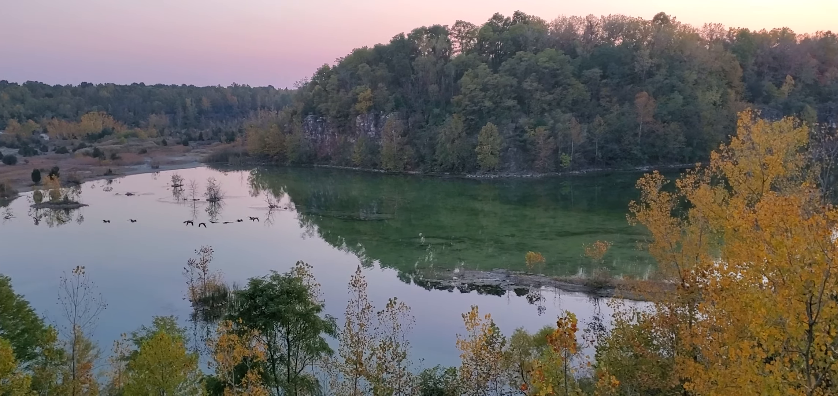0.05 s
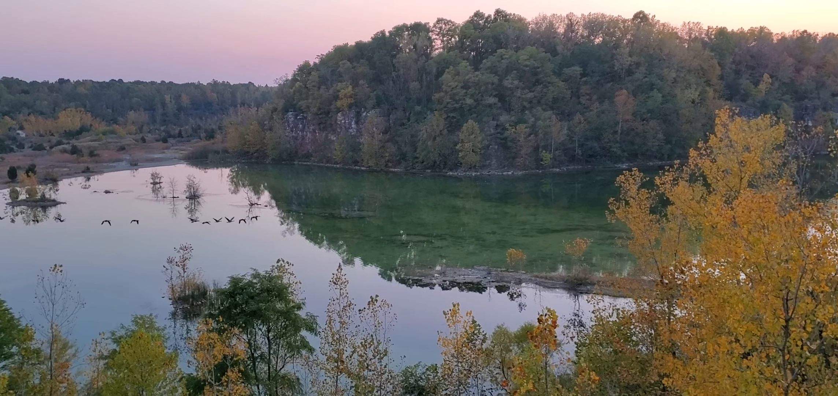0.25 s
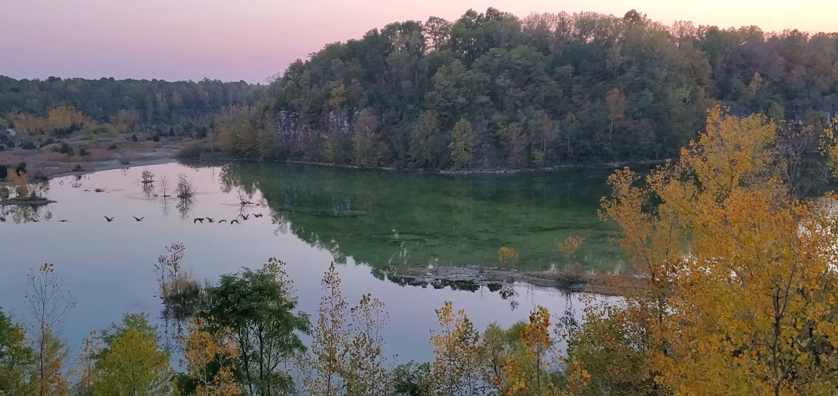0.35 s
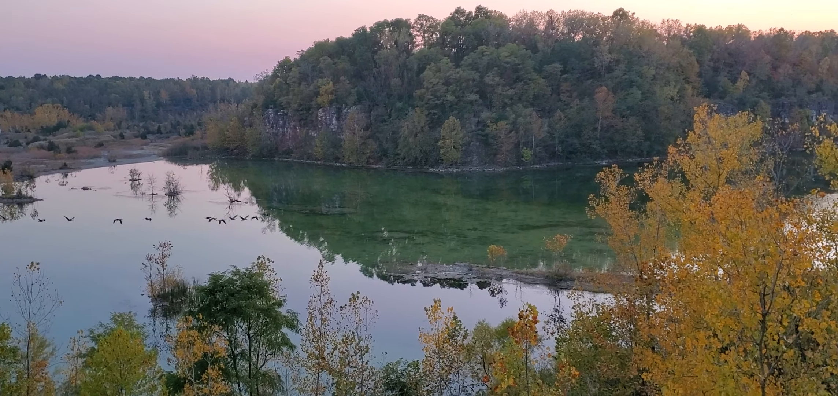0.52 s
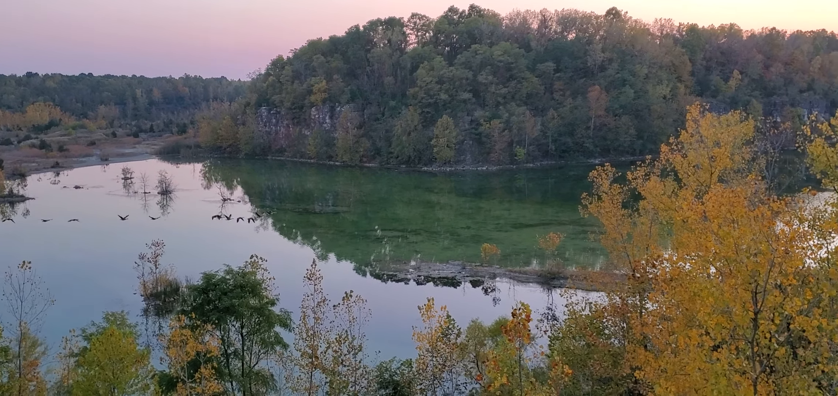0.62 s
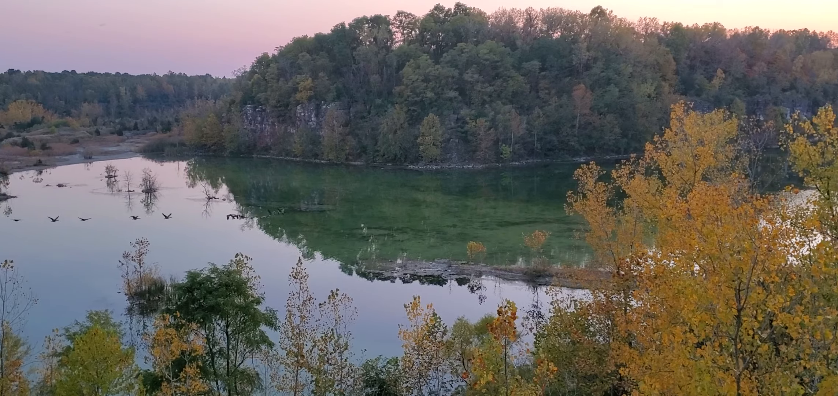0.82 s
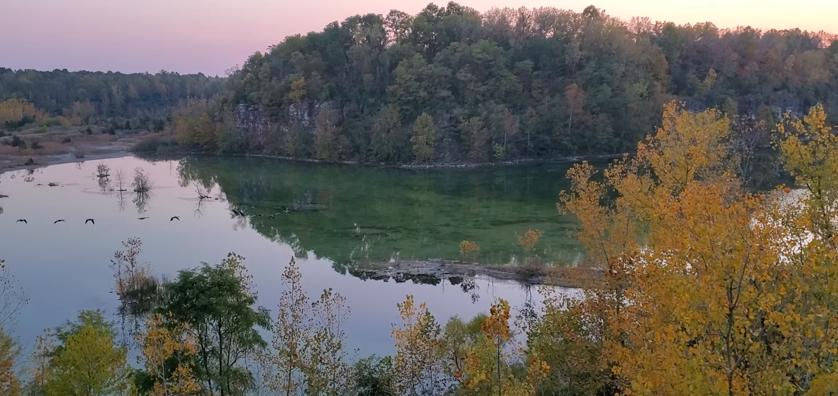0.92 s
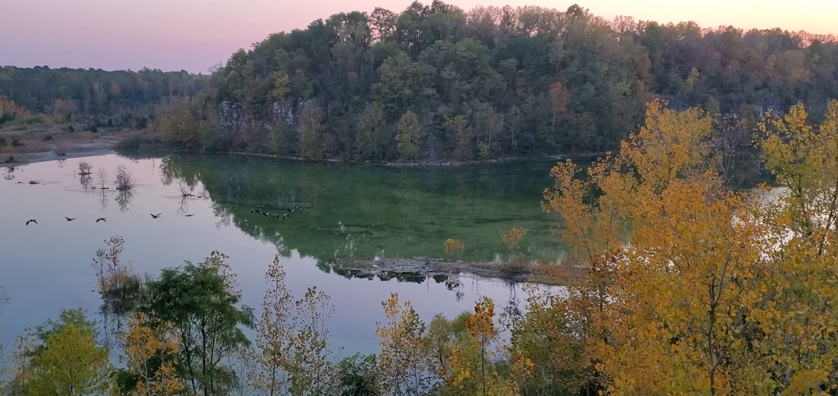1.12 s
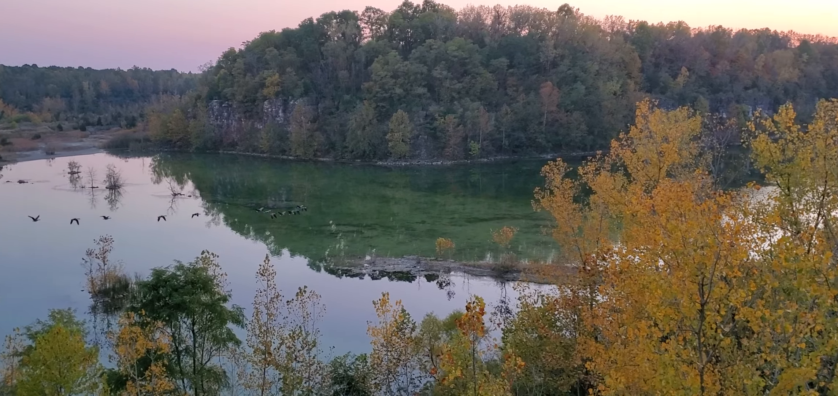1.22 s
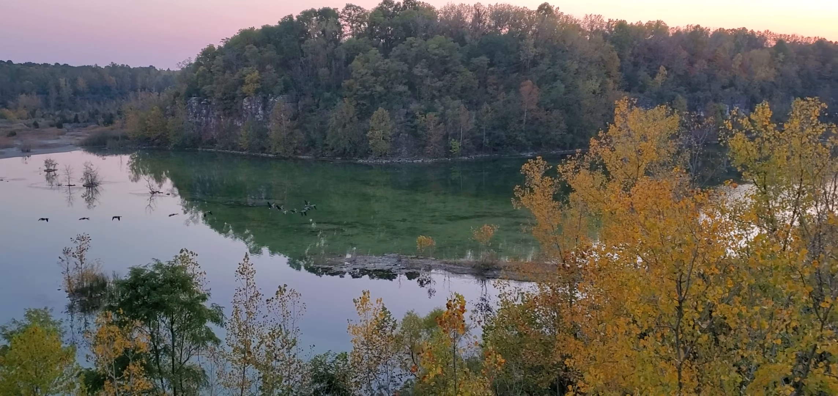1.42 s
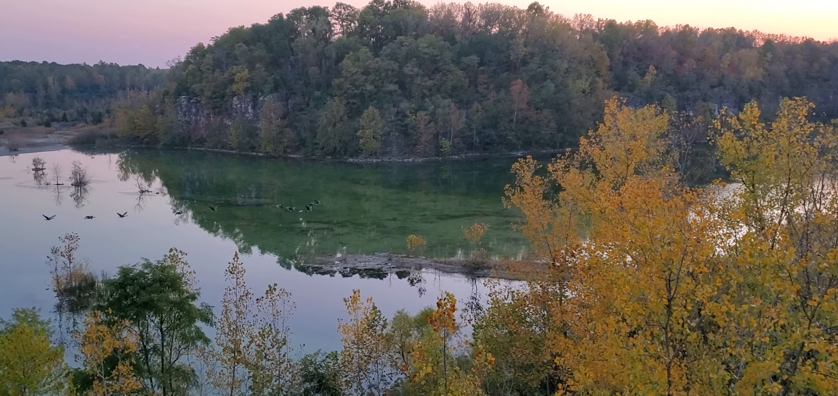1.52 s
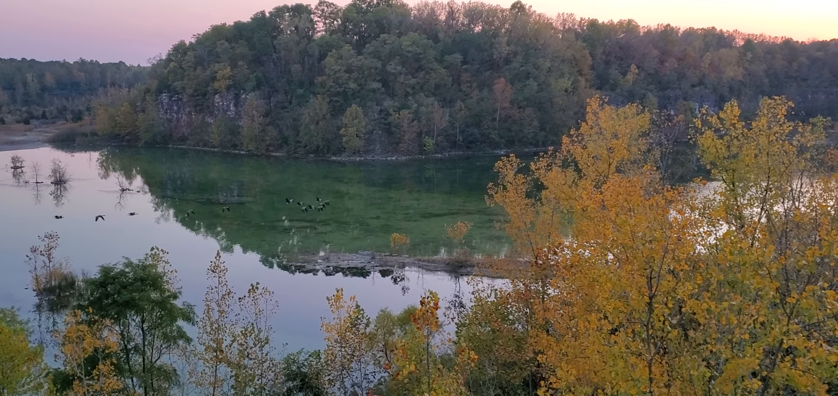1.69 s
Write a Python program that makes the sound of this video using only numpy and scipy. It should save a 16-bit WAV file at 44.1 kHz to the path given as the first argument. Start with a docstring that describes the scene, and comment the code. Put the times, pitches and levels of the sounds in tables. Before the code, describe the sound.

Two distant goose honks, rough then clear, echo over quiet water while handling knocks the microphone

```python
"""Geese honk twice, far off over a pond. Each honk starts low and rough and breaks up into a clear note;
the second drops back to a rasp. Each voice is a train of pulses plus air noise, rung through a throat.
Delayed and scattered copies of the calls make the echo of the wooded banks. Two handling thumps, which are
sinking tones with noise ticks, hit the left microphone port, and softer finger bumps follow the same path.
Shaped noise makes small rustles and the faint distant rumble and leaf hiss."""
import sys
import numpy as np
from scipy import signal
from scipy.fft import rfft, irfft, next_fast_len
from scipy.io import wavfile
from scipy.ndimage import map_coordinates

SR = 44100
rng = np.random.default_rng(int(sys.argv[2]) if len(sys.argv) > 2 else 0)


def pcm_store(signal):
    """Save signal as 16-bit PCM."""
    levels = np.round(np.clip(np.atleast_2d(signal), -1, 1) * 32767)
    wavfile.write(sys.argv[1], SR, levels.astype(np.int16).T)


N = 77175  # length in samples, 1.75 s

# Clear notes, one list each. Each row: time in seconds, pitch in Hz, level in dB, treble boost in dB.
CLEAR_NOTES = [
    [(.05, 516.3, -52.5, -9), (.09, 516.7, -41.5, -5.5), (.106, 533.4, -46, 0.5), (.122, 537, -38.5, -4.5),
     (.155, 541.7, -36, -7), (.172, 555, -43, 6), (.208, 557, -34.5, -1), (.235, 562, -40.5, -11),
     (.262, 547, -48, -1)],
    [(.57, 515, -67, -8), (.615, 528, -59, -8), (.655, 545, -56, -10), (.75, 545, -56, -16)],
    [(.85, 538, -53, 5), (.895, 548.5, -38, -11), (.92, 568, -44.5, 4), (.95, 576.7, -40.5, -9),
     (.98, 580.4, -51.5, -8), (1.01, 570, -71, -9)],
]
# Short rasps that open the first honk and close the second, one list each.
# Each row: time in seconds, pitch in Hz, level in dB, treble boost in dB.
SHORT_RASPS = [
    [(0, 172.7, -46.5, -11.5), (.034, 175.8, -57.5, -17), (.046, 185.6, -47, -6), (.085, 181, -50, 3),
     (.115, 170, -76, 0)],
    [(.965, 190, -74.5, 11), (.992, 187.6, -42.5, -1), (1.02, 185.3, -50, -19), (1.055, 171.4, -68, 6)],
]
# The long growl that opens the second honk.
# Each row: time in seconds, pitch in Hz, level in dB, treble boost in dB.
LONG_GROWL = [(.58, 177.7, -61.5, -1.5), (.67, 179.9, -52, -6), (.71, 179.8, -45.5, -9),
              (.765, 180.6, -50, -10.5), (.81, 178.1, -44, -9), (.87, 176.5, -43.5, -8),
              (.912, 182, -45, 3), (.932, 183.6, -50.5, 9)]
# Throat resonances for the clear notes. Each row: frequency in Hz, relative level in dB.
CLEAR_THROAT = [(400, -18), (550, -9), (1080, 0), (1180, 0), (1650, -23), (2230, -29), (2800, -24),
                (3350, -26), (3950, -24), (4480, -17), (5050, -20), (5600, -16), (6200, -17), (6800, -24),
                (7800, -40), (8400, -41), (12000, -60)]
# Throat resonances for the short rasps. Each row: frequency in Hz, relative level in dB.
ROUGH_THROAT = [(170, -25.5), (400, -25), (540, -5), (730, -2), (920, -9.5), (1100, -8.5), (1290, 3),
                (1480, -3.5), (1640, -16.5), (1820, -17.5), (2500, -15), (3200, -19), (4500, -32),
                (6200, -17.5), (7500, -30.5), (14000, -78)]
# Throat resonances for the growl. Each row: frequency in Hz, relative level in dB.
DEEP_THROAT = [(170, -43), (400, -44), (540, -14.5), (720, 4), (810, 2), (950, -5), (1080, 8), (1230, -5),
               (1330, 5), (1450, 4), (1570, -8.5), (1800, -18.5), (2500, -11), (3200, -26), (4500, -17),
               (6200, -22), (7500, -23.5), (14000, -77.5)]
# Tone of the air noise in the calls, mostly treble. Each row: frequency in Hz, relative level in dB.
AIR_TONE = [(1000, -13), (3500, 0)]
NOTE_JITTER, RASP_JITTER = .0025, .009  # random pitch wander, as a part of the pitch
NOTE_AIR_DB, RASP_AIR_DB = -12, 1  # air noise against the pulses, before the throat
NOTE_SCATTER_DB, RASP_SCATTER_DB = 0.9, 2  # uneven pulse sizes
RASP_WEAK, GROWL_WEAK = .1, .3  # share lost by every second pulse
LATE_CYCLES = .17  # a weakened pulse also comes late, by this part of a cycle times the share lost
EDGE_S = .014  # fade just outside each end of a call
TREBLE_HZ = 2700  # where the voice's treble begins

# How long the scatter from the trees rings. Each row: frequency in Hz, time to fall by 60 dB in seconds.
WOODS_FADE = [(300, 0.82), (1100, 0.41), (3000, 1), (6000, 0.24), (12000, 0.45)]
LEFT_LEAD_S, LEFT_DB = 0.00021, 2.5  # the calls reach the left first; left raised, right lowered by this
ECHO_S, ECHO_DB = .18, -21  # the far bank
WOODS_DB = -8.5  # scatter from the trees
NEAR_DB, NEAR_T60_S = -7, .1  # short scatter, and its time to fall by 60 dB

# Hard knocks of handling. Each row: start in seconds, level in dB, pitch it sinks to in Hz,
# tick level in dB before its tone curve, attack in seconds.
HARD_THUMPS = [(0.2651, -2.5, 246, -24, 0.00035), (0.6778, -4.5, 255, -28.5, 0.00058)]
# Tone curve of the ticks. Each row: frequency in Hz, gain in dB.
TICK_TONE = [(200, -3), (1400, 14.5), (2200, 2), (4000, 3), (6600, 5), (8000, -9.5), (11000, -6.5),
             (14000, -7), (16000, -6)]
# Soft finger bumps. Each row: start in seconds, level in dB before it dies away.
FINGER_BUMPS = [(0.106, -34), (.193, -31), (0.662, -32.5), (1.095, -35.5), (1.509, -36.5), (1.558, -43),
                (1.709, -35)]
THUMP_SWEEP_HZ, THUMP_SWEEP_S = 850, .0007  # extra pitch at the start, and how fast it goes
THUMP_LIFE_S = 0.0037
TICK_T60_S = 0.011
TICK_TAIL_DB, TICK_TAIL_T60_S = -29.5, 0.32  # faint shiver of the casing
BUMP_HZ, BUMP_T60_S = 380, 0.0083
LOW_CUT_HZ = 44  # for the handling only
FAR_PORT_DB = -14.5  # on top of its dull tone

# Small rustles at the microphone; one centred after the end is not heard.
# Each row: centre in seconds, level in dB, width in seconds.
RUSTLE_TIMES = [(4.3, -66, 0.051), (1.732, -67, .005), (1.73, -69.5, .03)]
# Tone of the rustles. Each row: frequency in Hz, relative level in dB per Hz.
RUSTLE_TONE = [(300, -20), (1400, -2), (3000, 5.5), (6500, -3.5), (9000, -22), (16000, -39)]
# Tone of the background. Each row: frequency in Hz, relative level in dB per Hz.
FLOOR_TONE = [(25, -43.5), (45, -7), (64, 2), (102, -5.5), (190, -7), (230, -11), (373, -6.5), (450, -9.5),
              (540, -14.5), (650, -25), (950, -26), (1100, -12), (1250, -24.5), (1600, -23.5), (1750, -35),
              (2080, -31), (2300, -18), (2750, -28), (3200, -25.5), (3900, -29), (5000, -26), (6000, -34.5),
              (8500, -38), (9400, -48.5), (16000, -41.5)]
# How alike the two sides are before the left boost. Each row: frequency in Hz, likeness from -1 to 1.
FLOOR_LIKENESS = [(60, 0.77), (130, 0.78), (300, 0.74), (640, 0.36), (1400, -0.26), (8000, 0.074)]
# Lean of the background. Each row: frequency in Hz, dB added on the left and taken off on the right.
FLOOR_LEAN = [(100, 0.2), (250, 2.3), (1000, 2), (12000, 2.5)]
# Slow rise and fall of the rumble. Each row: time in seconds, level change in dB.
RUMBLE_LEVEL = [(0, -2), (.2, 2.5), (.4, 3), (.55, -1.5), (.8, 2.5), (1.15, -1.5), (1.4, -0.5), (1.53, 0.5),
                (1.75, 0.5)]
FLOOR_DB = -56  # before the rumble wavers
TOP_HZ = 15900  # nothing is kept from here up


def amp(db):
    """Turn decibels into a gain."""
    return 10 ** (np.asarray(db) / 20)


def unit(x):
    """Scale to an rms (average strength) of 1."""
    return x / np.sqrt(np.mean(x ** 2) + 1e-20)


def along(points, hz):
    """Read a curve of (Hz, value) points on a log frequency axis."""
    f, v = np.transpose(points)
    return np.interp(np.log(hz + 1), np.log(f + 1), v)


def wobble(rate):
    """A smooth random curve with the given number of knots a second."""
    knots = rng.standard_normal(N // 10)
    return map_coordinates(knots, [np.arange(N) * rate / SR], mode="wrap")


def filtered(x, response):
    """Multiply the spectrum of x by a response that depends on frequency."""
    m = next_fast_len(N + SR // 2)  # spare room so that delays do not wrap round
    return irfft(rfft(x, m) * response(np.fft.rfftfreq(m, 1 / SR)), m)[..., :N]


def since(s):
    """Seconds passed since s, zero before."""
    return np.maximum(np.arange(N) / SR - s, 0)


def controls(rows):
    """A gate open over the rows' time span, then each column drawn out to every sample."""
    s, *cols = np.transpose(rows)
    t = np.arange(N) / SR
    gate = np.clip(1 + np.minimum(t - s[0], s[-1] - t) / EDGE_S, 0, 1)
    return [gate] + [np.interp(t, s, c) for c in cols]


def throat(x, shape):
    """Ring x through a filter of the given shape that only sounds after each push (minimum phase)."""
    size = 4096
    cep = irfft(np.log(amp(along(shape, np.fft.rfftfreq(size, 1 / SR)))))
    # fold the half that would sound too early onto the later half
    cep[1:size // 2] *= 2
    cep[size // 2 + 1:] = 0
    ring = irfft(np.exp(rfft(cep)))
    return signal.fftconvolve(x, ring)[:N]


def voice(hz, treble_db, weak, shape, air_db, scatter_db):
    """One pulse a cycle, of uneven size, and air noise that swells each cycle, through the throat."""
    cycles = np.cumsum(hz) / SR
    k = np.arange(1, int(cycles[-1]) - 1)
    lost = weak * (k % 2)
    at = np.interp(k + LATE_CYCLES * lost, cycles, np.arange(N))
    sizes = amp(scatter_db * rng.standard_normal(N // 10)[:len(at)]) * (1 - lost)
    # each pulse is spread over 16 samples, so it can fall between two samples
    taps = at.astype(int)[:, None] + np.arange(-7, 9)
    off = taps - at[:, None]
    kernel = np.sinc(off) * np.cos(np.pi * off / 16) ** 2
    places = np.clip(taps, 0, N - 1).ravel()
    pulses = np.bincount(places, (sizes[:, None] * kernel).ravel(), N)
    air = throat(rng.standard_normal(N), AIR_TONE) * (1 + np.cos(2 * np.pi * cycles))
    x = unit(throat(unit(pulses) + amp(air_db) * unit(air), shape))
    treble = filtered(x, lambda f: 1 - 1 / (1 + (f / TREBLE_HZ) ** 6))
    return x + (amp(treble_db) - 1) * treble


def call(rows, jitter, weak, shape, air_db, scatter_db):
    """One stretch of voice that follows its rows, with a slight random wander of pitch."""
    gate, hz, db, treble_db = controls(rows)
    pitch = hz * (1 + jitter)
    return gate * amp(db) * voice(pitch, treble_db, weak, shape, air_db, scatter_db)


def geese():
    """High clear notes; rasps and a growl near a third of that pitch, every second pulse weak and late."""
    out = np.zeros(N)
    for rows in CLEAR_NOTES:
        jitter = NOTE_JITTER * wobble(160)
        out += call(rows, jitter, 0, CLEAR_THROAT, NOTE_AIR_DB, NOTE_SCATTER_DB)
    rough = [(rows, ROUGH_THROAT, RASP_WEAK) for rows in SHORT_RASPS]
    rough.append((LONG_GROWL, DEEP_THROAT, GROWL_WEAK))
    for rows, shape, weak in rough:
        jitter = RASP_JITTER * wobble(150)
        out += call(rows, jitter, weak, shape, RASP_AIR_DB, RASP_SCATTER_DB)
    return out


def scatter(x, ir):
    """Smear x into many small reflections, given as fading noise for each side."""
    return signal.fftconvolve(x[None], ir / np.linalg.norm(ir[0]), axes=1)[:, :N]


def pond(x):
    """The direct sound comes from the left; the far bank answers late and dull, the trees scatter it."""
    side = np.array([[1], [-1]])  # left, right
    direct = filtered(x, lambda f: np.exp(1j * np.pi * f * LEFT_LEAD_S * side))
    bank = filtered(direct, lambda f: np.exp(-2j * np.pi * f * ECHO_S) / (1 + (f / 2500) ** 2))
    # noise that fades at its own speed in each frequency band
    hz, t, z = signal.stft(rng.standard_normal((2, SR)), SR, nperseg=256)
    fade = amp(-60 * t / along(WOODS_FADE, hz)[:, None])
    tail = signal.istft(z * fade, SR, nperseg=256)[1]
    near_t = np.arange(SR // 10) / SR
    near = rng.standard_normal((2, SR // 10)) * amp(-60 * near_t / NEAR_T60_S)
    answers = amp(ECHO_DB) * bank + amp(WOODS_DB) * scatter(x, tail) + amp(NEAR_DB) * scatter(x, near)
    return amp(LEFT_DB * side) * (direct + answers)


def thumps():
    """Dead knocks: a short tone that sinks in pitch, with a tick of noise that dies fast and a faint tail."""
    out = np.zeros(N)
    for s, db, hz, tick_db, attack in HARD_THUMPS:
        t = since(s)
        cycles = hz * t + THUMP_SWEEP_HZ * THUMP_SWEEP_S * (1 - np.exp(-t / THUMP_SWEEP_S))
        envelope = np.exp(-(t / THUMP_LIFE_S) ** 2) * (1 - np.exp(-t / attack))
        out -= amp(db) * np.sin(2 * np.pi * cycles) * envelope
        crack = amp(-60 * t / TICK_T60_S) + amp(TICK_TAIL_DB - 60 * t / TICK_TAIL_T60_S)
        out += throat(amp(tick_db) * crack * (t > 0) * rng.standard_normal(N), TICK_TONE)
    return out


def bumps():
    """Soft finger bumps: a tone that dies within a few milliseconds, its pitch slightly random."""
    out = np.zeros(N)
    for s, db in FINGER_BUMPS:
        t = since(s)
        hz = BUMP_HZ * (1 + 0.033 * rng.standard_normal())
        out += amp(db - 60 * t / BUMP_T60_S) * np.sin(2 * np.pi * hz * t)
    return out


def handling():
    """Thumps and bumps hit the left port; the far port hears them dull and weak."""
    low_cut = signal.butter(2, LOW_CUT_HZ, "highpass", fs=SR, output="sos")
    left = signal.sosfilt(low_cut, thumps() + bumps())
    dull = filtered(left, lambda f: 1 / (1 + (f / 600) ** 2) + 0.027)
    return np.array([left, amp(FAR_PORT_DB) * dull])


def rustles():
    """Brief soft brushes of noise, each swelling and fading smoothly."""
    t = np.arange(N) / SR
    level = sum(amp(db) * np.exp(-((t - s) / width) ** 2) for s, db, width in RUSTLE_TIMES)
    return level * unit(filtered(rng.standard_normal((2, N)), lambda f: amp(along(RUSTLE_TONE, f))))


def background():
    """Distant rumble and leaf hiss from shaped noise; the low part wavers."""
    def mid_side(f):
        # the mix of shared (mid) and opposite (side) noise sets how alike the two sides are
        turn = np.arccos(np.clip(along(FLOOR_LIKENESS, f), -1, 1)) / 2
        return amp(along(FLOOR_TONE, f)) * [np.cos(turn), np.sin(turn)]

    def lean(f):
        return amp(along(FLOOR_LEAN, f) * np.array([[1], [-1]]))

    mid, side = filtered(rng.standard_normal((2, N)), mid_side)
    pair = unit(filtered(np.array([mid + side, mid - side]), lean))
    low = filtered(pair, lambda f: 1 / (1 + (f / 600) ** 2))
    waver_db = controls(RUMBLE_LEVEL)[1] + 0.37 * wobble(10)
    return amp(FLOOR_DB) * (pair + (amp(waver_db) - 1) * low)


def scene():
    """Geese over the pond, handling, rustles and background."""
    return pond(geese()) + handling() + rustles() + background()


def record(dry):
    """Keep only what lies below the band limit."""
    return filtered(dry, lambda hz: hz < TOP_HZ)


dry = scene()
out = record(dry)
pcm_store(out)
```